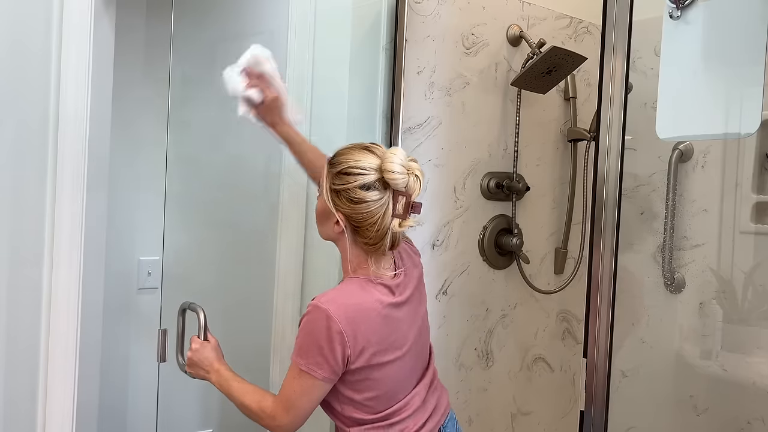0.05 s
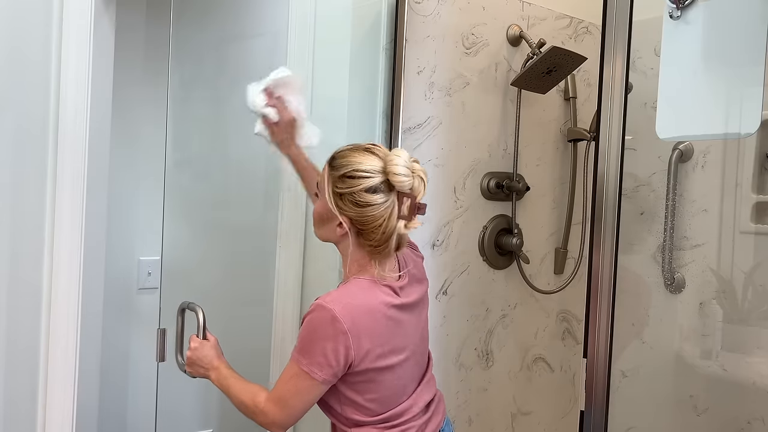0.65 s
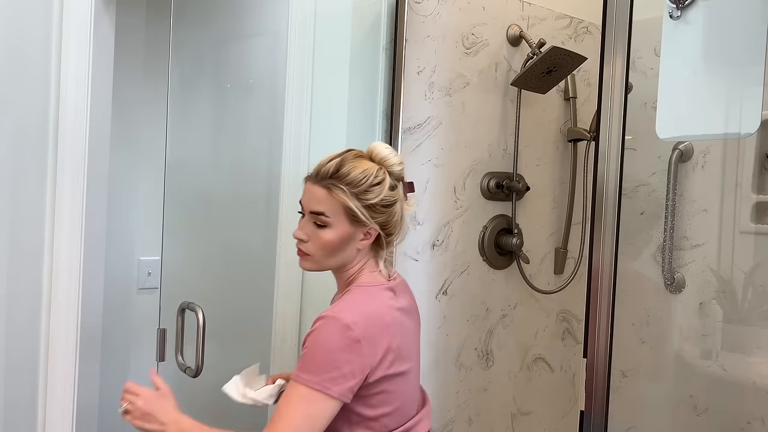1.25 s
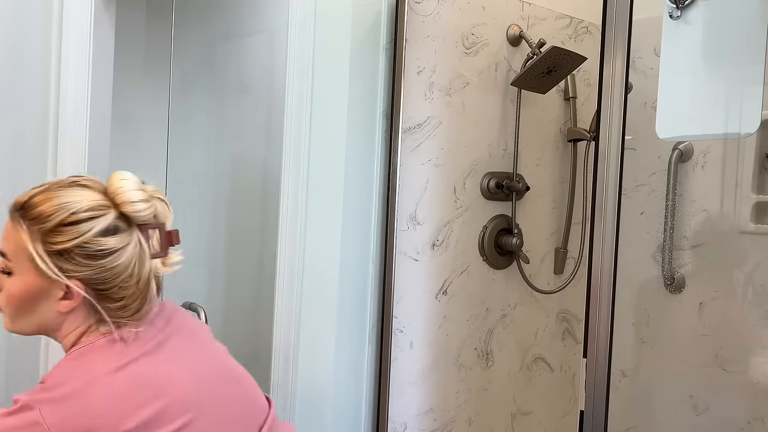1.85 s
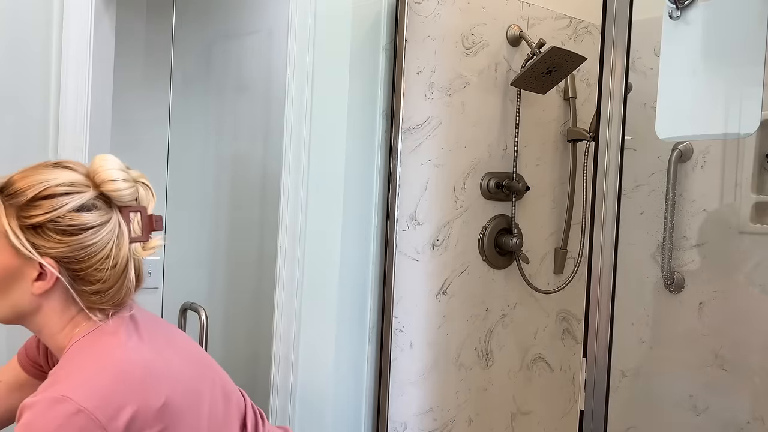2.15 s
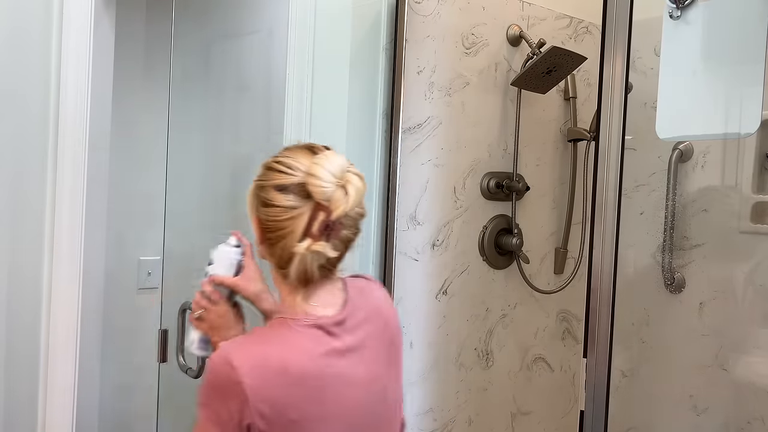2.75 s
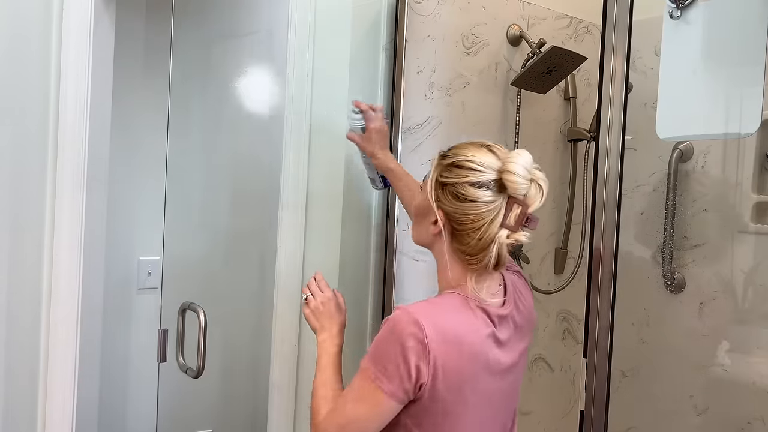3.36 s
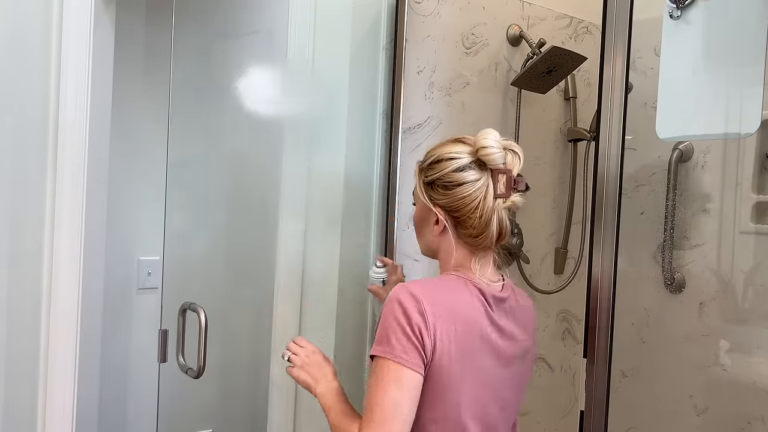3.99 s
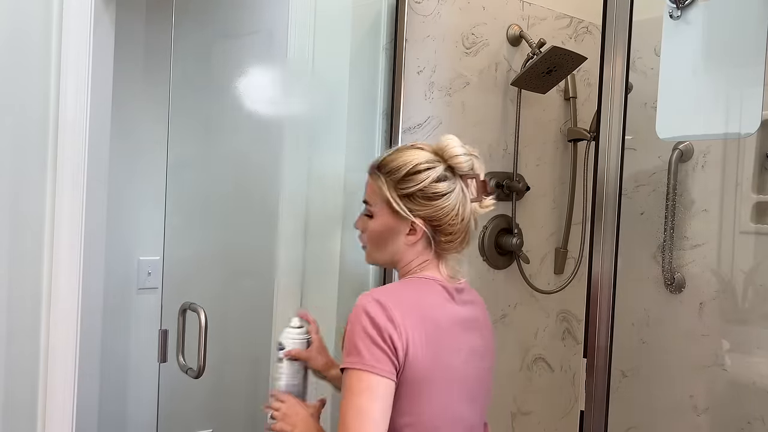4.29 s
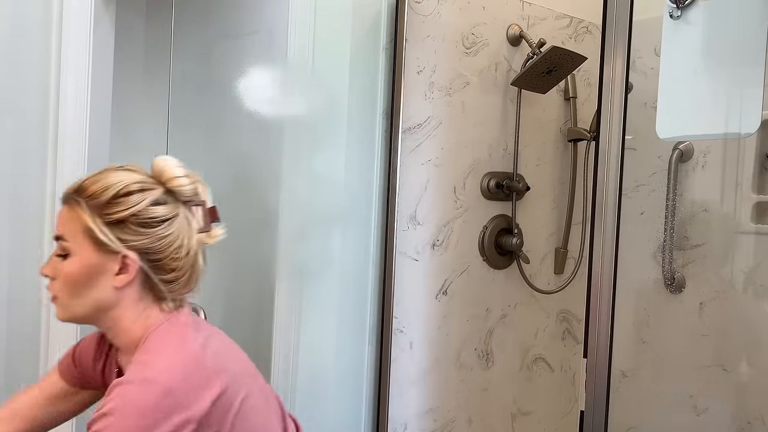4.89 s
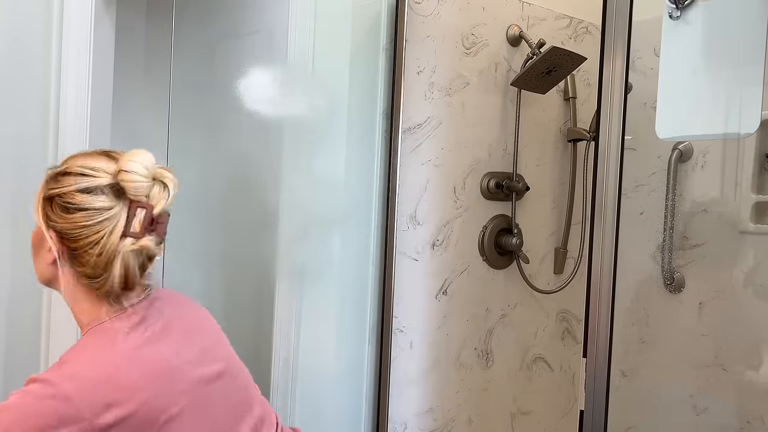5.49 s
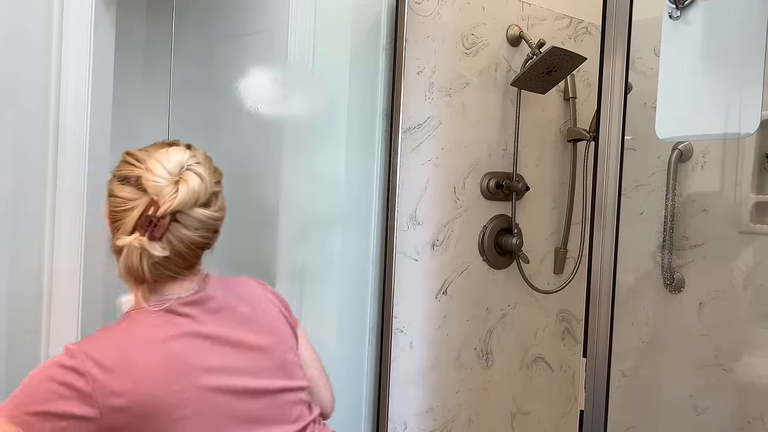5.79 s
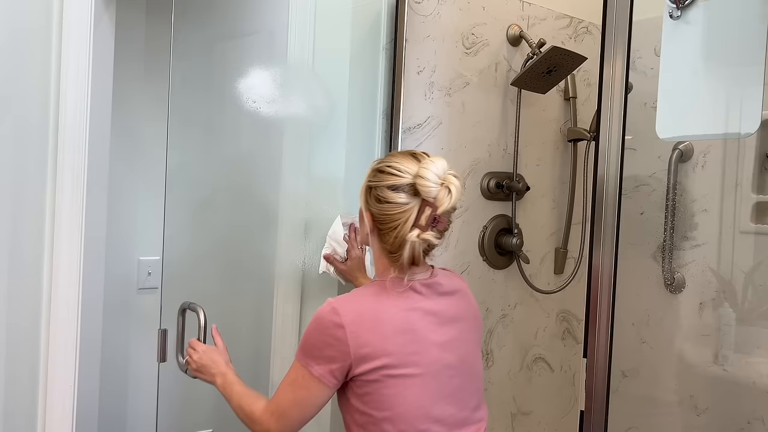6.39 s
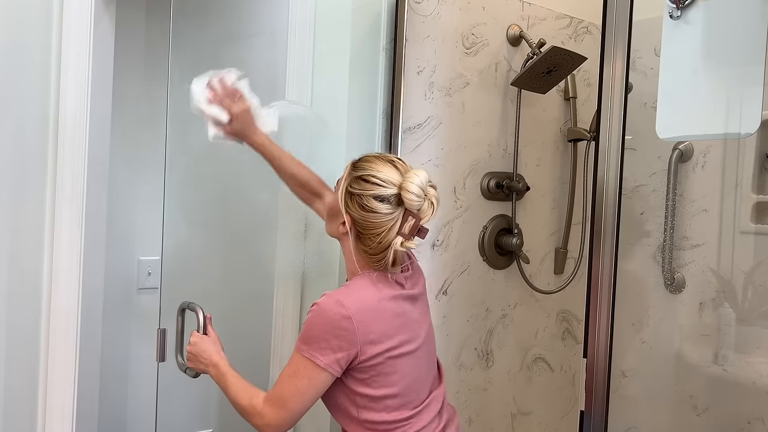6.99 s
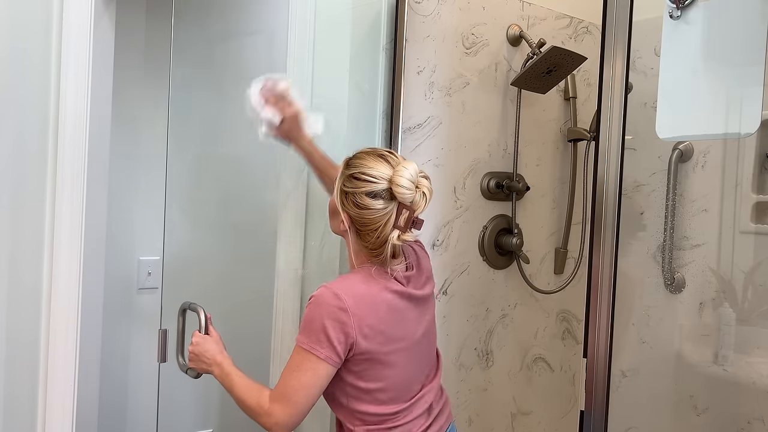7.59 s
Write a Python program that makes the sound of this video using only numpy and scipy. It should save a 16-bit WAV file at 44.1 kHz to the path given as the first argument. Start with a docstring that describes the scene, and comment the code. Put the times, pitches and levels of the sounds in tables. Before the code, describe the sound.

Cloth rubbing on glass stops for knocks on a vanity and a hiss of spray foam, then resumes in a tiled bathroom.

```python
"""A tiled, echoing bathroom. A cloth wipes the glass shower door, its fibres catching and slipping.
The wiping stops and something knocks on the vanity, ringing wood and metal. An aerosol can spits
propellant, then hisses foam onto the glass; two more knocks come as the can is put away, and the
wiping resumes. Soft thuds and finger taps fall in between, all over a low mains hum."""
import sys
import numpy as np
from scipy import signal
from scipy.fft import rfft, irfft, next_fast_len
from scipy.io import wavfile

SR = 44100
rng = np.random.default_rng(int(sys.argv[2]) if len(sys.argv) > 2 else 0)


def wav_record(signal):
    """Record a signal, one row per channel, as 16-bit PCM in the file named by sys.argv[1]."""
    frames = np.transpose(np.atleast_2d(signal))
    bounded = np.clip(frames, -1, 1)
    # unit amplitude maps onto the largest positive 16-bit level
    quanta = np.round(bounded * 32767).astype(np.int16)
    wavfile.write(sys.argv[1], SR, quanta)


N = 337219
TIME = np.arange(N) / SR

# Strokes of the cloth. Each row: start, speed-up and slow-down in seconds, then the relative levels
# of friction, fibre hiss and pane rumble in dB.
CLOTH_STROKES = [(-0.1, 0.076, 0.13, -65, -66, -72), (0.24, 0.066, 0.11, -71.5, -63.5, -67),
                 (0.38, 0.027, 0.56, -73, -66.5, -71), (0.6, 0.19, .2, -67, -60, -87),
                 (0.98, .1, 0.18, -62.5, -64, -64), (1.346, 0.013, .22, -70.5, -69, -67),
                 (4.962, 0.19, .1, -59.5, -55.5, -67), (5.19, 0.08, 0.11, -60.5, -56, -81),
                 (6.075, 0.074, 0.11, -67, -52.5, -67), (6.17, .11, 0.15, -64.5, -56, -70),
                 (6.34, 0.087, 0.33, -61.5, -58.5, -66), (6.62, 0.32, 0.17, -63, -56, -70.5),
                 (7.04, 0.037, 0.18, -66.5, -62.5, -90), (7.19, 0.022, 0.19, -62.5, -67, -67),
                 (7.41, 0.026, 0.11, -68, -66, -85), (7.575, 0.018, 0.087, -98, -61, -78)]
# Light contact between strokes. Each row: start and end in seconds, friction and hiss in relative dB.
LIGHT_CONTACTS = [(0, 1.123, -68, -68), (1.165, 1.844, -73, -75), (4.98, 5.48, -65.5, -63.5),
                  (6.045, 7.657, -66.5, -67)]


def wiping(speed_powers=(0.75, 1.1, 0.68)):
    """Gains of friction, fibre hiss and pane rumble: each grows as a power of the hand's speed."""
    power = np.zeros((3, N))
    for start, rise_s, fall_s, *levels_db in CLOTH_STROKES:
        speed = swing(start, rise_s, fall_s)
        for layer, db, exponent in zip(power, levels_db, speed_powers):
            layer += (from_db(db) * speed ** exponent) ** 2
    for start, end, *levels_db in LIGHT_CONTACTS:
        touch = held(start, end, rise_s=0.033, fall_db_per_s=500)
        power[:2] += np.outer(from_db(levels_db), touch) ** 2
    return np.sqrt(power)


def rubbing(per_s, spread_db, hiss):
    """Countless fibres catch and slip: the larger ticks stand out of a smooth, diffuse hiss."""
    ticks = in_room(grains(per_s, spread_db), bathroom(direct=0.35))
    return ticks + hiss * rng.standard_normal((2, N))


# Rustles as the can is handled. Each row: start, speed-up and slow-down in seconds, relative dB.
SLEEVE_RUSTLES = [(2.08, 0.11, 0.2, -64), (2.8, 0.098, 0.11, -61.5), (2.92, 0.097, 0.28, -59),
                  (3.056, 0.027, 0.079, -56.5), (4.33, 0.071, 0.27, -67)]
# Midrange rub, airy fibres, low pane rumble, crisp sleeve. Each row: frequency in Hz, gain in dB.
FRICTION_EQ = [(100, -15.5), (250, -9.5), (420, -9), (620, -3), (1100, 1), (1800, 1), (3000, -5.5),
               (5000, -11), (12000, -26)]
FIBRE_EQ = [(800, -26), (2000, -2.5), (3500, -1), (5800, -4), (9000, -6.5), (12500, -11.5), (16000, -20.5)]
PANE_EQ = [(40, -10), (100, 10.5), (170, -7), (280, -0.5), (420, -8), (800, -37), (3000, -63)]
SLEEVE_EQ = [(200, -5), (800, -10.5), (1400, 2), (3000, 6), (5500, 6), (9000, 2), (12500, -3.5),
             (16000, -10)]


def cloth(damp_from_s=6.9):
    """Strokes over glass and counter, fizzing like the spray on damp glass; light rustles between."""
    friction, fibres, rumble = wiping()
    rustles = [from_db(db) * swing(*timing) for *timing, db in SLEEVE_RUSTLES]
    rustle = np.linalg.norm(rustles, axis=0)
    coarse = rubbing(per_s=1500, spread_db=3.0, hiss=0.72)
    fine = rubbing(per_s=2500, spread_db=4.0, hiss=0.91)
    fizz = rng.standard_normal((2, N))
    layers = [(1.0, friction, coarse, FRICTION_EQ),
              (1.0, rumble, coarse, PANE_EQ),
              (1.5, fibres, fine, FIBRE_EQ),
              (4.0, rustle, fine, SLEEVE_EQ),
              (-5.0, fibres * (TIME > damp_from_s), fizz, JET_EQ)]
    return sum(from_db(trim_db) * envelope * rms_one(colour(texture, eq))
               for trim_db, envelope, texture, eq in layers)


# Spits as the valve is pressed. Each row: start in seconds, level in dB.
GAS_SPURTS = [(3.141, -37.5), (3.193, -28)]
# Bright gas jet and fuller foam. Each row: frequency in Hz, gain in dB.
JET_EQ = [(200, -31.5), (1500, -26), (3000, -16.5), (4500, -10.5), (5900, -7.5), (7000, -8), (8400, -3),
          (9800, -3.5), (12500, -1), (16000, -2)]
FOAM_EQ = [(150, -22), (350, -22), (600, -10), (1000, -5), (2200, 4.5), (4000, 3.5), (6500, 1.5), (9500, 1),
           (12500, 2.5), (16000, -1.5)]


def spray(open_s=3.197, shut_s=4.082, foam_db=-48.5, gas_db=-58):
    """Bare propellant spurts first; then foam and a little gas flow evenly until the valve shuts."""
    flow = held(open_s, shut_s, rise_s=0.0065, fall_db_per_s=248)
    spurts = [from_db(db) * held(s, s, rise_s=0.0076, fall_db_per_s=106) for s, db in GAS_SPURTS]
    gas = np.max([*spurts, from_db(gas_db) * flow], axis=0)
    jet = gas * rms_one(colour(rng.standard_normal(N), JET_EQ))
    foam = rms_one(colour(grains(per_s=12000, spread_db=1.0), FOAM_EQ))
    return flutter(jet + from_db(foam_db) * flow * foam, direct=0.26)


def flutter(x, direct, sweeps_per_s=8.7, spots=3):
    """A fluttering jet sounds from several spots, each with echoes of its own."""
    nearness = np.cos(np.pi * (sweeps_per_s * TIME + np.arange(spots)[:, None] / spots)) ** 2
    nearness /= np.linalg.norm(nearness, axis=0)
    return sum(in_room(x * share, bathroom(direct)) for share in nearness)


# Knocks on the vanity. Each row: start in seconds, part struck, blow in relative dB, contact cut-off
# in Hz, can pitch in Hz, can ring and crack in relative dB, gain of the direct sound.
VANITY_KNOCKS = [(1.839, "door", -9, 1584, 4245, -2.5, -13.5, 0.1),
                 (1.843, "door", -5.5, 1560, 4250, -16, -20.5, 0.22),
                 (1.854, "door", -14, 1300, 4160, 0.5, -27.5, 0.33),
                 (1.874, "door", -10.5, 1350, 4270, -18, -38.5, 0.85),
                 (5.476, "top", -5, 1900, 3557, -2, -16, 0.057),
                 (5.6723, "top", -1, 2330, 3750, -7, -13.5, 0.087)]
# The cabinet's hollow body. Each row: frequency in Hz, gain in dB.
CABINET_EQ = [(40, -62), (80, -11.5), (130, -4.5), (220, -8), (350, -11), (500, -1), (750, -7),
              (1100, -4.5), (1500, -2), (1950, -10.5), (3000, -10), (5000, -15.5), (10000, -31),
              (16000, -30)]
# The can's ring. Each row: multiple of its pitch, bandwidth in Hz, relative level in dB.
CAN_MODES = [(1, 35, 1.5), (1.018, 50, -5), (1.565, 88.3, -13.5), (1.635, 110, -16)]
# Cabinet door and counter top. Each row: pitch in Hz, relative level in dB, seconds to fall 60 dB.
DOOR_MODES = [(155.8, -6.5, 0.54), (267, -12, 0.55), (355, -29, 1.1), (462, -7, 0.62), (551, 1, 0.56),
              (692, 1.5, 0.77), (718, -10, 0.22), (816, -7.5, 0.88), (969, -1.5, 0.83), (1209, -18, 1.6),
              (1213, 1, 0.58), (1336, 4, 0.88), (1624, -1.5, 0.72)]
COUNTER_MODES = [(234.2, -9, 0.85), (361, -6, 0.61), (394, -7.5, 0.6), (551, 0, 0.66), (692, -1, 0.91),
                 (885, -3, 0.81), (1100, -32, 0.91), (1020, -32, 1.7), (1177, 3, 0.39), (1390, -20, 0.87),
                 (1520, -25, 0.4), (1670, -13, 0.43)]


def knocks(blow_trim_db=23.0, can_trim_db=9.0, wood_trim_db=-24.0, crack_hz=9000):
    """A blow shakes the cabinet and rings the can; the harder the crack, the more the wood rings."""
    out, click = np.zeros((2, N)), signal.unit_impulse(SR)
    short_paths = bathroom(direct=0.18, early=2.5, early_s=0.0016)
    for s, part, db, contact_hz, can_hz, can_db, crack_db, direct in VANITY_KNOCKS:
        blow = from_db(db + blow_trim_db) * colour(low_pass(click, contact_hz), CABINET_EQ)
        can = sum(from_db(can_db + mode_db + can_trim_db) * resonate(click, can_hz * ratio, width)
                  for ratio, width, mode_db in CAN_MODES)
        add(out, s, in_room(blow + can, bathroom(direct, early=0.39, early_s=0.017)))
        add(out, s, from_db(crack_db) * in_room(low_pass(click, crack_hz), short_paths))
        wood = ring(DOOR_MODES if part == "door" else COUNTER_MODES)
        add(out, s, from_db(crack_db + wood_trim_db) * wood)
    return out


def ring(modes, attack_s=0.0013):
    """One second of decaying wood tones, each a quarter cycle apart left and right, for a wide ring."""
    t, out = TIME[:SR], 0
    for hz, db, t60 in modes:
        turns = rng.random() + rng.choice([-1, 1]) * np.array([[0], [.25]])
        out = out + from_db(db - 60 * t / t60) * np.sin(2 * np.pi * (hz * t + turns))
    return out * (1 - np.exp(-t / attack_s))


# Footfalls and soft pushes on door and cabinet. Each row: start in seconds, relative dB, boom in Hz.
SOFT_THUDS = [(0.283, -22, 109), (1.085, -0.5, 79), (1.412, -9, 70.5), (2.646, -22, 201),
              (4.44, -24.5, 198), (5.491, 11.5, 75), (5.679, 4, 60), (6.214, -6, 176), (6.225, -3, 113),
              (6.26, -7.5, 150), (7.22, -24, 117)]
# Fingers on can and handle. Each row: start in seconds, relative dB, pitch in Hz, share of bright snap.
FINGER_TAPS = [(2.512, -31.5, 1500, 0.034), (2.635, -22, 872, .015), (2.669, -30, 1500, 0.045),
               (2.862, -24, 5000, 0.3), (3.2, -15, 1654, .06), (4.37, -17, 1300, 0.12),
               (4.372, -13.5, 2170, .096), (4.421, -18, 1220, .04), (4.454, -19.5, 1410, .03),
               (4.511, -26, 1300, 0.028), (7.591, -27, 5000, 0.22)]


def thuds_and_taps(tap_width_hz=800):
    """Heavily damped contacts: feet and door give a dull boom, fingers a short pitched tick."""
    out, click = np.zeros((2, N)), signal.unit_impulse(SR)
    near = bathroom(direct=0.32, early=1.7, early_s=0.0023)
    for s, db, hz in SOFT_THUDS:
        cutoff_hz = 1.57 * hz
        boom = 2 * low_pass(low_pass(resonate(click, hz, width_hz=hz), cutoff_hz), cutoff_hz)
        add(out, s, from_db(db) * in_room(boom, bathroom(direct=0.57, early=1.1)))
    for s, db, hz, snap in FINGER_TAPS:
        tick = resonate(resonate(click, hz, tap_width_hz), hz, 2 * tap_width_hz)
        add(out, s, from_db(db) * in_room(0.95 * tick + snap * click, near))
    return out


# The bass-heavy bed of room air. Each row: frequency in Hz, gain in dB.
AIR_EQ = [(20, -28), (33, -14.5), (45, -8), (62, 2), (85, -6.5), (130, -14.5), (250, -23), (600, -32),
          (1500, -31.5), (2600, -29), (9000, -31), (12500, -27.5), (16000, -28.5)]


def room_tone(air_db=-68, hum_hz=57.6, hum_db=-65):
    """Still air and a wavering mains hum."""
    waver = 1 + 0.1 * rms_one(low_pass(rng.standard_normal(N), hz=5.9))
    hum = rms_one(waver * np.sin(2 * np.pi * hum_hz * TIME))
    air = rms_one(colour(rng.standard_normal((2, N)), AIR_EQ))
    return from_db(air_db) * air + from_db(hum_db) * hum


# Reverb of the tiles. Each row: band centre in Hz, seconds for the main tail to fall 60 dB.
TILE_DECAY = [(60, 0.53), (160, 0.62), (500, 0.78), (1400, 0.9), (3000, 0.68), (6000, 0.8), (12000, 0.39)]


def bathroom(direct, early=0.97, early_s=0.011, late_db=-30, late_stretch=2.6):
    """Echo pattern of one spot: the direct sound, strong first reflections, a tail that dies by band."""
    t, hz = TIME[:SR], np.fft.rfftfreq(SR, 1 / SR)
    white, tail = np.exp(2j * np.pi * rng.random((2, len(hz)))), 0
    centres, t60s = np.transpose(TILE_DECAY)
    for band, t60 in zip(np.eye(len(centres)), t60s):
        fall = np.log(1000) * t / t60
        # sound from an adjoining room lingers in a faint, slower second tail
        decay = np.exp(-fall) + from_db(late_db) * np.exp(-fall / late_stretch)
        tail = tail + irfft(white * np.interp(hz, centres, band), SR) * decay
    echoes = rms_one(tail * (1 + early * np.exp(-t / early_s))) / np.sqrt(SR)
    echoes[:, 0] += direct
    return echoes


def in_room(x, echoes):
    return signal.fftconvolve(np.atleast_2d(x), echoes, axes=1)[:, :x.shape[-1]]


def swing(start, rise_s, fall_s):
    """Speed of the hand in one movement, 0 to 1: it speeds up, then slows to rest."""
    ramp = np.minimum((TIME - start) / rise_s, 1 - (TIME - start - rise_s) / fall_s)
    return np.sin(np.pi / 2 * np.clip(ramp, 0, 1))


def held(start, end, rise_s, fall_db_per_s):
    """Gain that rises at the start, holds until the end, then dies away."""
    return np.clip((TIME - start) / rise_s, 0, 1) * from_db(-fall_db_per_s * np.clip(TIME - end, 0, 2))


def grains(per_s, spread_db):
    """Random clicks of uneven size and sign; rms 1."""
    sizes = from_db(spread_db * np.minimum(rng.exponential(1, N), 4))
    return rms_one((rng.random(N) < per_s / SR) * sizes * rng.choice([-1, 1], N))


def colour(x, eq, size=8192):
    """Causal (minimum-phase) filter with the given EQ curve."""
    gain = from_db(at_hz(eq, np.fft.rfftfreq(size, 1 / SR)))
    cepstrum = irfft(np.log(gain))
    cepstrum[1:size // 2] *= 2
    cepstrum[size // 2 + 1:] = 0
    impulse = irfft(np.exp(rfft(cepstrum)))
    return signal.oaconvolve(np.atleast_2d(x), impulse[None], axes=1)[:, :x.shape[-1]]


def resonate(x, hz, width_hz):
    return signal.lfilter(*signal.iirpeak(hz, hz / width_hz, fs=SR), x + 1e-18)


def low_pass(x, hz):
    return signal.sosfilt(signal.butter(2, hz, fs=SR, output="sos"), x + 1e-18)


def at_hz(points, hz, column=1):
    points = np.array(points)
    return np.interp(np.log(hz + 1), np.log(points[:, 0]), points[:, column])


def from_db(db):
    return 10 ** (np.asarray(db) / 20)


def rms_one(x):
    return x / np.sqrt(np.mean(x ** 2) + 1e-20)


def add(out, s, sound):
    start = round(s * SR)
    out[:, start:start + sound.shape[-1]] += sound[..., :N - start]


def scene():
    return cloth() + spray() + knocks() + thuds_and_taps() + room_tone()


# Tone and stereo image of the microphones. Each row: frequency in Hz, gain in dB, left over right
# in dB, likeness of the channels from 0 to 1, phase between them in half turns.
MIC_PAIR = [(94, -1.5, 1, 0.99, 0.17), (230, 4, -1.5, 0.44, 0), (437, 6.5, 0.3, 0.3, 0.51),
            (1300, 4.5, 1.5, 0.32, 0.7), (2740, 1, 1, 0.8, 0.4), (4000, 0.5, 6, 0, 1),
            (6800, 0, 9, 0.4, 0.4), (7940, -4.5, -3.5, 0.13, 0.9), (8040, 0, 10.5, .1, 0.58),
            (9430, -2, -1.5, 0.1, 0.5)]
# In the top octave the two channels are mostly alike.
MIC_PAIR += [(10400, -4, 0, .99, 1), (11150, -3, 0, .98, 1), (11800, -1, 0, .55, .5),
             (12400, 1, 0, .7, .1), (12900, 0, 0, .99, 0), (14400, -2, 0, .99, 0),
             (15500, -2, 0, .5, .8)]


def record(dry):
    """The microphone pair colours and blends the channels by frequency; deep bass and top are cut."""
    low_cut_hz, high_cut_hz = 38, 15750
    size = 2 * next_fast_len(N // 2 + SR // 4, True)
    hz = np.fft.rfftfreq(size, 1 / SR)
    low_cut = signal.butter(4, low_cut_hz, "high", fs=SR, output="sos")
    left, right = rfft(signal.sosfilt(low_cut, dry), size)
    tone_db, balance_db, alike, half_turns = [at_hz(MIC_PAIR, hz, column) for column in (1, 2, 3, 4)]
    right = alike * left * np.exp(-1j * np.pi * half_turns) + np.sqrt(1 - alike ** 2) * right
    pair = np.array([left, right]) * from_db([tone_db + balance_db / 2, tone_db - balance_db / 2])
    high_cut = 1 / np.sqrt(1 + (hz / high_cut_hz) ** 400)
    return irfft(pair * high_cut)[:, :N]


dry = scene()
out = record(dry)
wav_record(out)
```